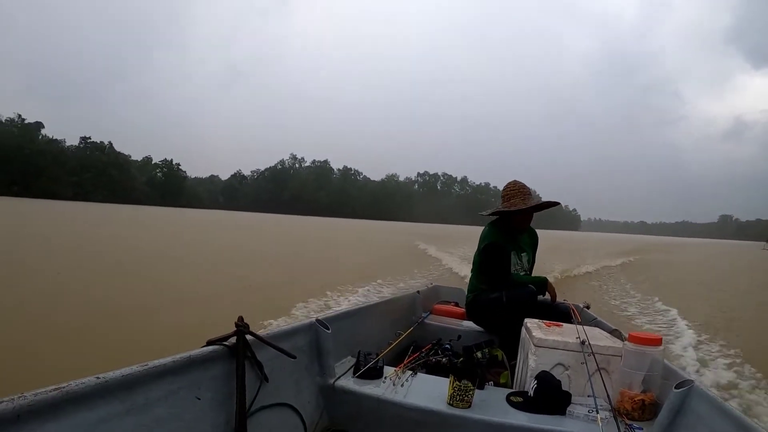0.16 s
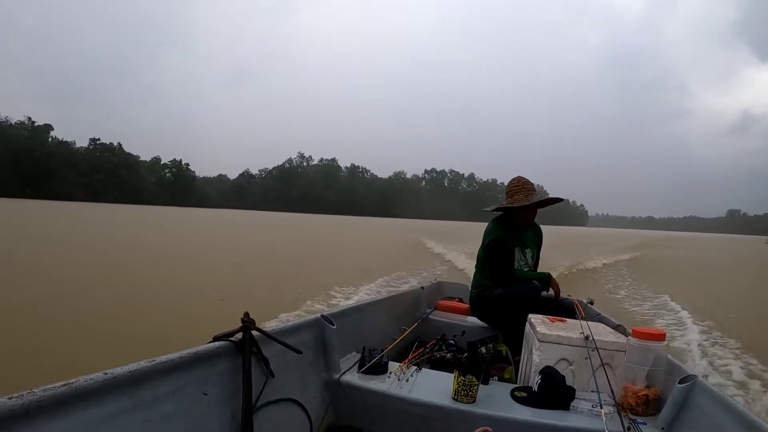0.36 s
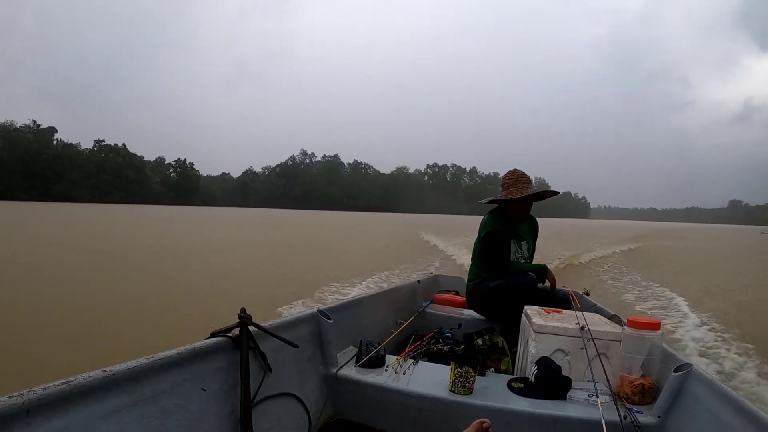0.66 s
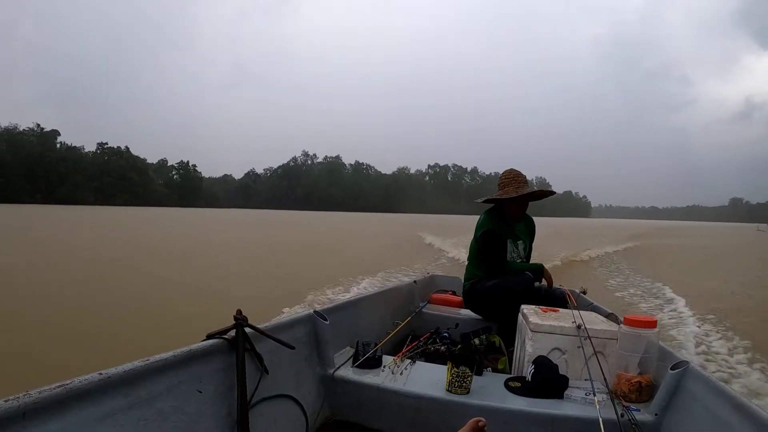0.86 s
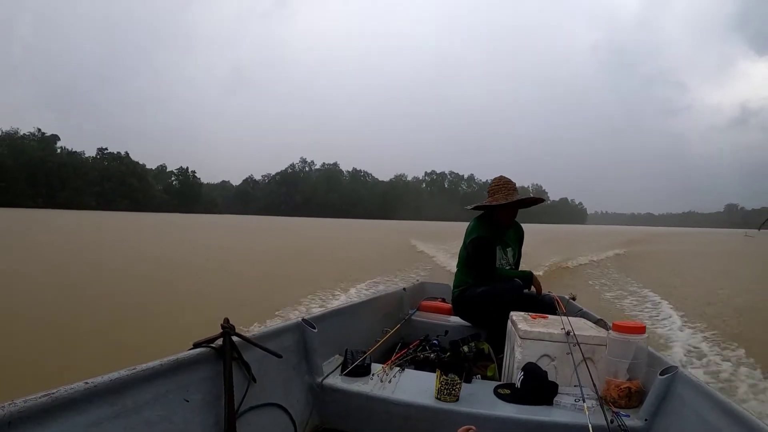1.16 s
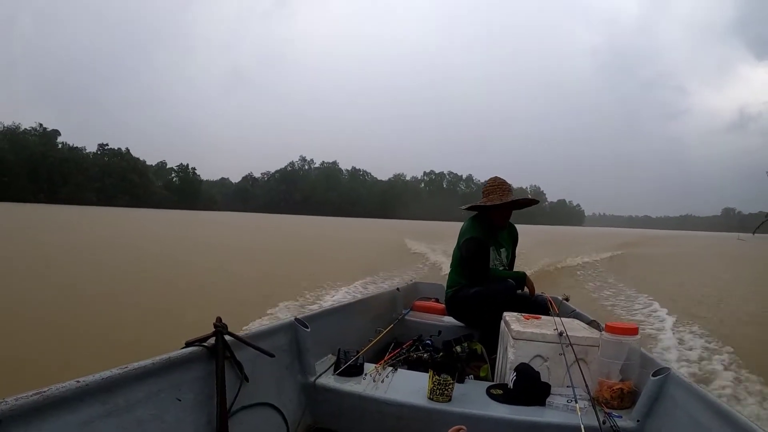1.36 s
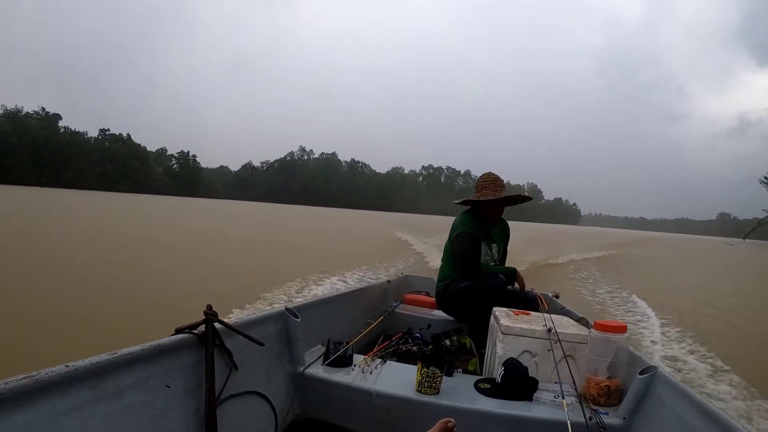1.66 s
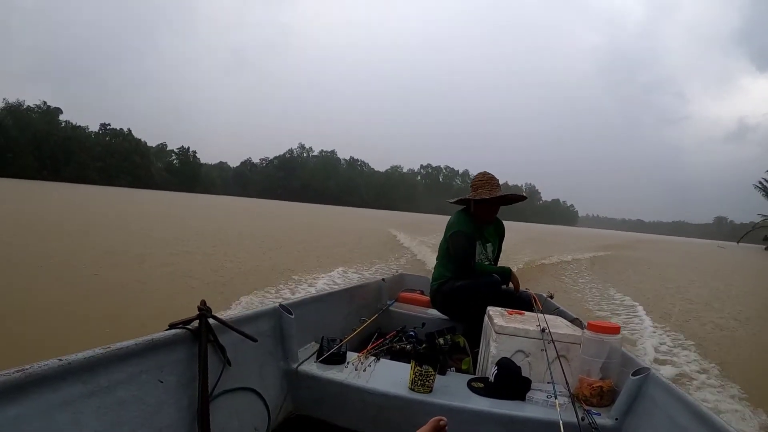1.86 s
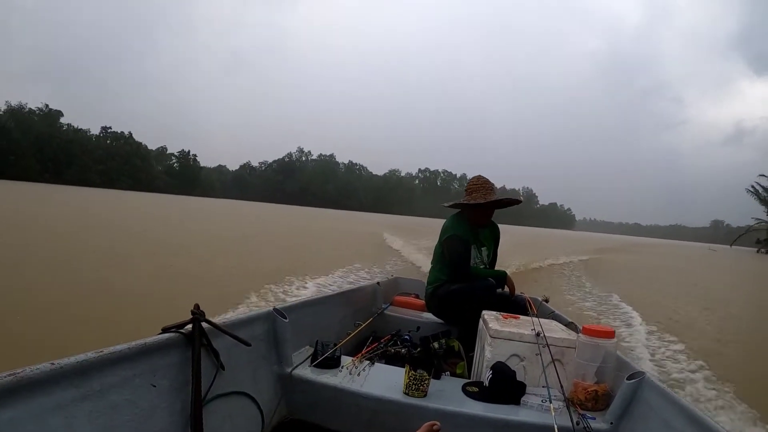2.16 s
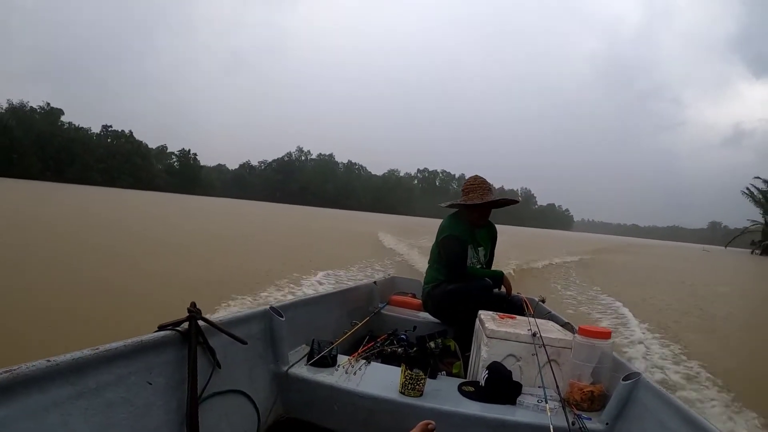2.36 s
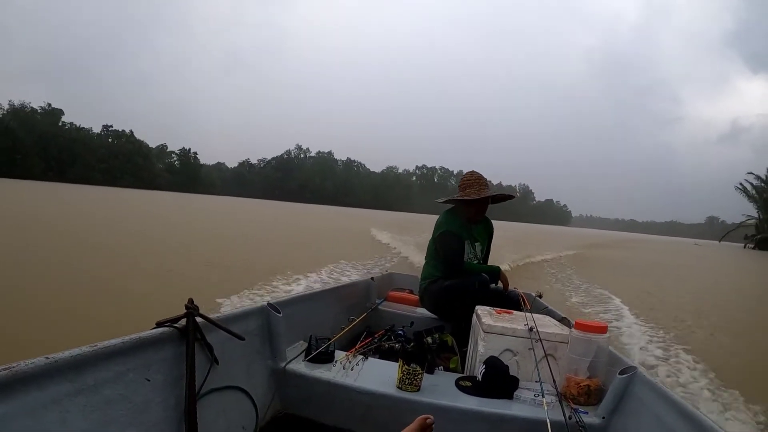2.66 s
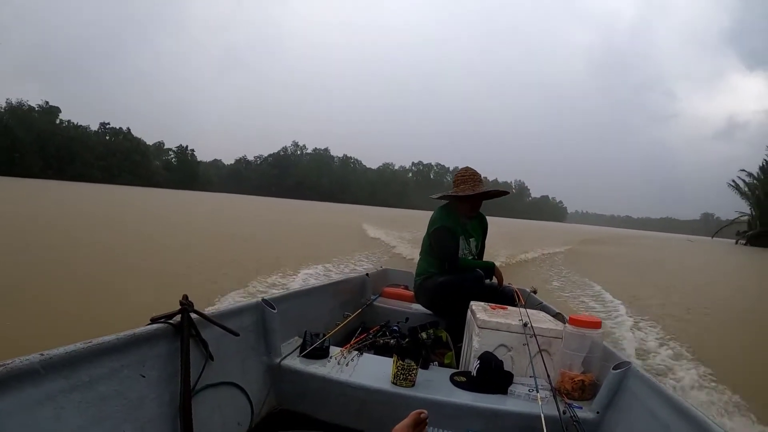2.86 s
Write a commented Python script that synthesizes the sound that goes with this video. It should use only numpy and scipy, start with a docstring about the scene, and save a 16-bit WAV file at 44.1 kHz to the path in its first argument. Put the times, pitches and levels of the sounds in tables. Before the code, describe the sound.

Loud continuous outboard drone, heard from the bow of a small boat on an open river, over hull roar and rushing water. Early wind buffets and splashes give way to small spray ticks; wide stereo narrows to mono.

```python
"""Outboard at full speed, from the bow

An outboard motor on a small open metal boat on a river, heard by a stereo microphone at the bow.
The motor is a sum of sines at crankshaft orders, with propeller-shaft side tones and a swelling gear whine.
Water is banded noise with ringing grains of spray and burble; splashes and low-mid buffets are short
dying bursts of noise, each in its own band. Wind is low banded noise at the microphone.
The wide stereo picture narrows towards mono in the first second.
"""
import sys
import numpy as np
from scipy import signal
from scipy.io import wavfile

SR = 44100
rng = np.random.default_rng(int(sys.argv[2]) if len(sys.argv) > 2 else 0)


def file_out(sig):
    """Save sig as 16-bit WAV at sys.argv[1]."""
    # one column per channel
    cols = np.atleast_2d(sig).T
    # limit, then scale
    lim = np.clip(cols, -1, 1)
    pcm = np.round(lim * 32767).astype(np.int16)
    wavfile.write(sys.argv[1], SR, pcm)


def boost_factor(decibels):
    """Convert a level in decibels to a linear amplitude factor."""
    exponent = np.asarray(decibels, float) / 20
    return 10 ** exponent


N = 132300   # samples

# Wind at the microphone. Each row: frequency in Hz, relative level in dB per Hz.
WIND_SPECTRUM = [(15, -7.5), (35, 1.5), (110, 4), (220, -6.5), (400, -13), (700, -36)]
# Gusts; only a share of the swing about the mean is heard. Each row: time in seconds, level in dB.
GUST_LEVEL = [(0.0, -41), (0.2, -22.5), (0.38, -26), (0.48, -19), (0.53, -31.5), (0.74, -32), (1.58, -31),
              (1.63, -25), (1.82, -46.5), (2.21, -34.5), (2.26, -36), (3.0, -35.5)]
# Rush of water and hull roar. Each row: frequency in Hz, relative level in dB per Hz.
RUSH_SPECTRUM = [(150, -6), (300, -5), (520, -8), (680, -17), (820, -18.5), (1000, -18.5), (1400, -22.5),
                 (2200, -26), (2900, -27.5), (4500, -34), (7000, -46), (10500, -55.5), (12500, -59),
                 (15500, -73)]
# Side of the rush against its middle. Each row: frequency in Hz, level difference in dB.
RUSH_SIDE_TILT = [(200, 2.5), (450, -1.5), (900, -1.5), (2500, 0.5), (5000, 4), (9000, 9.5), (15000, -1.5)]
# Rushing water; only the swing about the mean is used. Each row: time in seconds, level in dB.
FLOW_LEVEL = [(0.0, -40), (1.13, -44), (3.0, -44)]
# Burble; its swing about the mean is deepened later. Each row: time in seconds, level in dB.
CHURN_LEVEL = [(0.0, -26.5), (0.01, -31.5), (0.05, -32.5), (0.07, -28), (0.11, -29), (0.33, -33.5),
               (0.63, -29.5), (0.68, -36.5), (0.73, -28.5), (1.55, -32), (1.97, -29), (1.98, -26),
               (2.09, -34), (2.1, -26.5), (2.13, -28.5), (2.67, -29.5), (2.97, -31), (3.0, -36)]
# Splashes and low-mid buffets. Each row: start in seconds, peak level in dB, lowest and highest
# frequency in Hz, time to fall 60 dB in seconds.
SPLASHES_AND_BUFFETS = [(.065, -19, 302, 1480, 0.21), (0.08, -27, 1500, 7560, .02),
                        (.125, -22, 300, 2180, .25), (0.131, -29, 1500, 7920, 0.016),
                        (.145, -30, 2500, 7860, 0.024), (.378, -35.5, 6000, 10500, .05),
                        (0.414, -39, 5130, 10400, .015), (.550, -22, 880, 2240, .08),
                        (.630, -34.5, 3500, 5500, .035), (.767, -34, 4800, 9000, 0.044),
                        (1.011, -17, 3300, 3920, 0.013), (1.018, -32, 3830, 4180, 0.032),
                        (1.017, -30.5, 4200, 8000, 0.011), (1.072, -37.5, 6500, 8500, 0.032),
                        (1.343, -29.5, 3500, 9900, .03), (1.547, -35, 4300, 5830, 0.022),
                        (1.574, -24, 1600, 3607, 0.018), (1.779, -35, 4500, 6500, 0.036),
                        (1.837, -35, 4300, 6240, 0.039), (1.9, -30, 3800, 7302, 0.031),
                        (2.100, -25, 1200, 2010, 0.17), (2.171, -31, 4000, 10100, 0.041),
                        (2.292, -28, 3200, 5200, 0.029), (2.343, -41, 6500, 8790, 0.029),
                        (2.518, -31, 3200, 4193, 0.042), (2.550, -26.5, 1003, 2000, 0.15),
                        (2.626, -28.5, 3700, 5270, 0.031), (2.727, -40.5, 6200, 8000, .06),
                        (2.978, -27, 1500, 3187, .03)]
# Crankshaft speed. Each row: time in seconds, turns per second in Hz.
CRANK_SPEED = [(0.0, 73.35), (0.04, 71.1), (0.33, 71.16), (0.38, 72.3), (0.56, 70.88), (1.6, 71.22),
               (1.67, 71.8), (1.73, 71.48), (2.0, 71.08), (2.06, 71.4), (2.33, 71.05), (2.41, 71.0),
               (2.74, 71.26), (3.0, 72.27)]
# Motor orders. Each entry: tone frequency in crankshaft turns.
MOTOR_ORDERS = [1, 2, 3, 4, 5, 6, 7, 8, 9, 10, 11, 12, 13, 16]
# Strength of each motor order in turn. Each row: rms level in dB, wavering in dB.
ORDER_LEVELS = [(-21, -0.4), (-7.5, 0.34), (-29, 1.35), (-22.5, 0.65), (-30, 0.9), (-19, 1.07),
                (-50.5, 8.5), (-32.5, 0.06), (-45.5, 4), (-57.5, 4), (-46, 2), (-43.5, 1.5), (-42, 3.5),
                (-44.5, -0.5)]
# Side tones. Each row: motor order, propeller shaft turns added, rms level in dB.
SHAFT_SIDE_TONES = [(0, 1, -38), (1, 1, -38), (2, 1, -43), (3, 1, -39), (4, -1, -41), (4, 1, -32.5),
                    (5, 1, -44), (6, 1, -40), (7, 1, -48), (8, 1, -51)]
# Gear whine. Each entry: tone frequency in crankshaft turns.
GEAR_ORDERS = [38, 40, 41]
# Swell of each whine tone. Each row: time in seconds, rms level in dB.
WHINE_SWELL = [(0, -50.5), (.4, -56), (0.801, -53), (1.2, -58), (1.8, -57), (1.89, -50), (2.06, -49),
               (2.14, -55), (2.4, -53), (2.8, -52), (3, -55)]


def rms_one(x):
    """Scale to unit rms."""
    return x / np.sqrt(np.mean(x ** 2) + 1e-20)


def curve(rows):
    """Draw a table of time and value as a line over every sample."""
    return np.interp(np.arange(N) / SR, *np.transpose(rows))


def swing(rows):
    """A level curve around its mean, in dB."""
    db = curve(rows)
    return db - db.mean()


def drift(rate_hz):
    """Slow chance of unit rms: white noise through a double low-pass, computed every 20 samples."""
    r = np.exp(-2 * np.pi * rate_hz * 20 / SR)
    white = rng.standard_normal(N // 20 + 3002)
    slow = signal.lfilter([1], [1, -2 * r, r * r], white)[3000:]   # skip the run-in
    return np.interp(np.arange(N) / 20, np.arange(len(slow)), rms_one(slow - slow.mean()))


def band(x, low_hz, high_hz):
    """Band-pass between two frequencies."""
    sos = signal.butter(2, [low_hz, min(high_hz, 0.45 * SR)], "band", fs=SR, output="sos")
    return signal.sosfilt(sos, x)


def banded_noise(spectrum, slow_db, fast_db, slow_hz, fast_hz, tilt=((20, 0), (20000, 0))):
    """Middle and side rows of unrelated noise in third-octave bands that flicker partly together."""
    hz, db = np.transpose(spectrum)
    tilt_hz, tilt_db = np.transpose(tilt)
    edges = hz[0] * 2 ** np.arange(0, np.log2(hz[-1] / hz[0]) + 0.2, 1 / 3)
    white = rng.standard_normal((2, 2, N + SR // 4))   # neighbouring bands take turns with two noises
    shared = drift(fast_hz)
    out = 0
    for k, (low, high) in enumerate(zip(edges, edges[1:])):
        centre = np.log(low * high) / 2
        side_db = np.interp(centre, np.log(tilt_hz), tilt_db)
        level = np.interp(centre, np.log(hz), db) + np.array([[0], [side_db]])
        flicker = slow_db * drift(slow_hz) + fast_db * (0.5 * shared + 0.59 * drift(fast_hz))
        out = out + band(white[k % 2], low, high)[:, -N:] * boost_factor(level + flicker)
    return out / np.std(out[0])


def wind():
    """Middle and side of the wind at the microphone: lumpy low noise that follows the gusts."""
    level_db = -23 + 0.35 * swing(GUST_LEVEL)
    middle, side = banded_noise(WIND_SPECTRUM, slow_db=3.1, fast_db=0.52, slow_hz=1.5, fast_hz=5.9)
    return boost_factor(level_db) * middle, boost_factor(level_db + 4) * side


def water_rush(angle):
    """Middle and side of the rush along the hull: banded noise that pulses once a crankshaft turn."""
    flow = swing(FLOW_LEVEL)
    rush = boost_factor(-24.5) * banded_noise(RUSH_SPECTRUM, slow_db=0.5, fast_db=1.5, slow_hz=5.4, fast_hz=15,
                                     tilt=RUSH_SIDE_TILT)
    rush = rush * (1 + 0.14 * np.cos(angle))
    treble = band(rush, 2000, 16000)
    # the low rush follows only part of the flow's swing
    return boost_factor(0.65 * flow) * (rush - treble) + boost_factor(flow) * treble


def resonate(x, hz, r):
    """Two-pole ring; r is the decay per sample."""
    w = 2 * np.pi * hz / SR
    return signal.lfilter([0, np.sin(w)], [1, -2 * r * np.cos(w), r * r], x + 1e-18)


def grains(per_s, spread_db, cycles, low_hz, high_hz):
    """Drops or bubbles at random, in clumps, each falling 60 dB over a few cycles; unit rms."""
    sizes = boost_factor(spread_db * np.minimum(rng.exponential(1, N), 4)) * rng.choice([-1, 1], N)
    born = rng.random(N) < per_s / SR * boost_factor(4 * drift(10))   # the drift gathers them into clumps
    pitch = rng.integers(0, 16, N)
    out = 0
    for k, hz in enumerate(np.geomspace(low_hz, high_hz, num=16)):
        ring = resonate(sizes * born * (pitch == k), hz, boost_factor(-60 * hz / (cycles * SR)))
        out = out + boost_factor(-5 * np.log2(hz / low_hz)) * ring   # higher pitches are driven more weakly
    return rms_one(out)


def spray():
    """Fine drops as short high ringing grains that follow the flow."""
    level_db = -48.5 + swing(FLOW_LEVEL)
    return boost_factor(level_db) * grains(per_s=900, spread_db=2.5, cycles=5.4, low_hz=1730, high_hz=9000)


def burble():
    """Bubbles as lower ringing grains that follow the churn with a deepened swing."""
    level_db = -36.5 + 2.7 * swing(CHURN_LEVEL)
    return boost_factor(level_db) * grains(per_s=300, spread_db=3.5, cycles=7.3, low_hz=614, high_hz=2000)


def hull_hum():
    """The hull hums under the water: narrow noise around 970 Hz with a slow waver."""
    hum = rms_one(band(rng.standard_normal(N), 910, 1030))
    return boost_factor(-40.5 + 1.8 * drift(2.7)) * hum


def splashes_and_buffets():
    """Splashes and low-mid buffets: short dying bursts of dull noise, each in its own band."""
    out = np.zeros(N + 6000)
    t = np.arange(6000) / SR
    rise = 1 - np.exp(-t / 0.0004)
    white = rng.standard_normal((len(SPLASHES_AND_BUFFETS), len(t)))
    dull = signal.sosfilt(signal.butter(2, 4500, fs=SR, output="sos"), white)   # low-pass, Hz
    for (start_s, db, low, high, t60), noise in zip(SPLASHES_AND_BUFFETS, dull):
        burst = noise * boost_factor(-60 * t / t60) * rise
        burst = band(band(burst, low, high), low, high)
        first = int(start_s * SR)
        out[first:first + len(t)] += boost_factor(db) * burst / np.abs(burst).max()
    return out[:N]


def shaft_angle():
    """Crankshaft angle in radians, the running sum of its speed."""
    return 2 * np.pi * np.cumsum(curve(CRANK_SPEED)) / SR


def wavering_tone(order, db, waver_db, angle):
    """A sine locked to the crankshaft at a multiple of its speed, with a drifting rms level."""
    level = np.sqrt(2) * boost_factor(db + waver_db * drift(9))
    return level * np.cos(order * angle + rng.uniform(0, 2 * np.pi))


def motor_drone(angle):
    """Clean tones at multiples of the crankshaft speed."""
    return sum(wavering_tone(order, db, waver_db, angle)
               for order, (db, waver_db) in zip(MOTOR_ORDERS, ORDER_LEVELS))


def shaft_tones(angle):
    """Side tones shifted from the motor orders by turns of the slower propeller shaft."""
    gear_ratio = 2.08   # crankshaft turns per propeller shaft turn
    return sum(wavering_tone(order + turns / gear_ratio, db, 1.3, angle)
               for order, turns, db in SHAFT_SIDE_TONES)


def gear_whine(angle):
    """High swelling gear tones inside the breathy ring of the gear case, a band of noise."""
    swell = curve(WHINE_SWELL)
    air = boost_factor(swell + 3) * rms_one(band(rng.standard_normal(N), 2600, 3036))
    return air + sum(wavering_tone(order, swell, 1.5, angle) for order in GEAR_ORDERS)


def motor(angle):
    """Drone, side tones and whine, weaker at first while the picture is still wide."""
    settle_db = -3.5 * np.exp(-np.arange(N) / SR / 0.14)
    return boost_factor(settle_db) * (motor_drone(angle) + shaft_tones(angle) + gear_whine(angle))


def scene():
    """Left and right from middle and side; the side dies away as the picture closes."""
    t = np.arange(N) / SR
    angle = shaft_angle()
    wind_middle, wind_side = wind()
    rush_middle, rush_side = water_rush(angle)
    engine = motor(angle)
    water = rush_middle + spray() + burble() + hull_hum()
    middle = wind_middle + water + splashes_and_buffets() + engine
    side = boost_factor(-32 * t) * rush_side   # fades in dB per second
    side = side + boost_factor(-34 * t) * (wind_side - boost_factor(-34.5) * engine)
    return middle + side * np.array([[1], [-1]])


def high_hiss():
    """Faint high hiss, separate noise in each channel."""
    low_hz, high_hz = 11500, 14600
    white = rng.standard_normal((2, N))
    return boost_factor(-69) * rms_one(band(band(white, low_hz, high_hz), low_hz, high_hz))


def band_limit(x):
    """A steep low-pass at the top of the band."""
    return signal.sosfilt(signal.butter(12, 15390, fs=SR, output="sos"), x)


def record(dry):
    """Peaks are rounded softly, hiss is added and the sum is clipped at full scale."""
    top = 2.1   # ceiling of the soft rounding, full scale = 1
    rounded = top * np.tanh(dry / top)
    mix = np.clip(rounded + high_hiss(), -1, 1)
    return band_limit(mix)


dry = scene()
out = record(dry)
file_out(out)
```